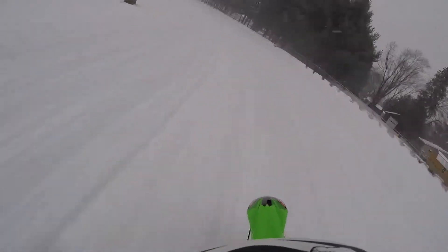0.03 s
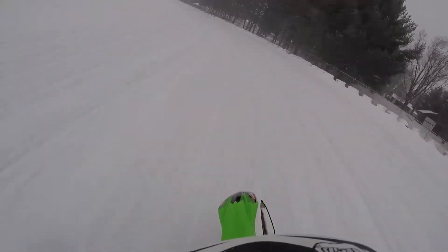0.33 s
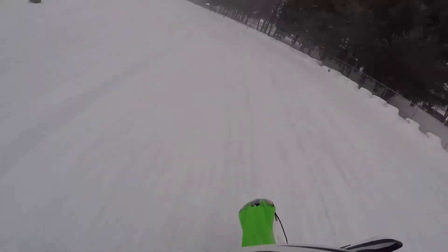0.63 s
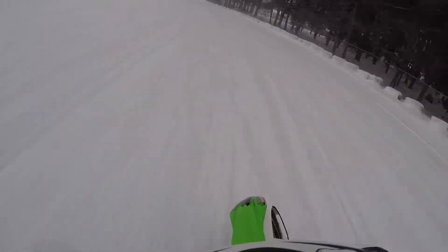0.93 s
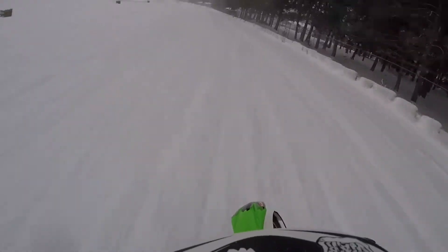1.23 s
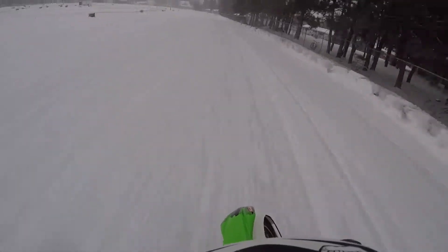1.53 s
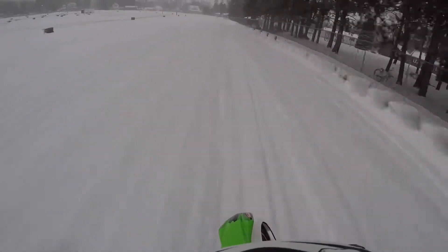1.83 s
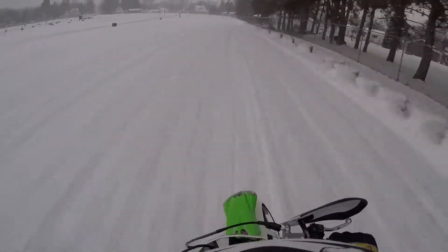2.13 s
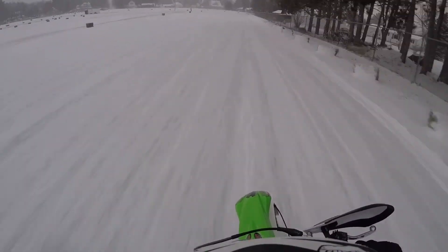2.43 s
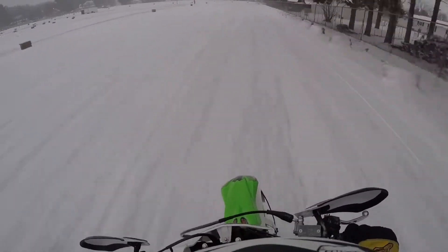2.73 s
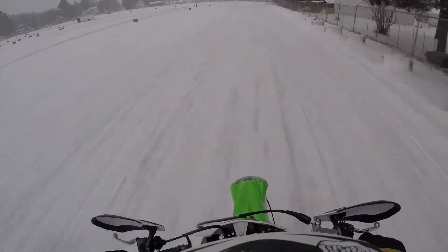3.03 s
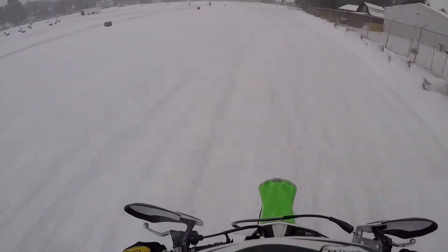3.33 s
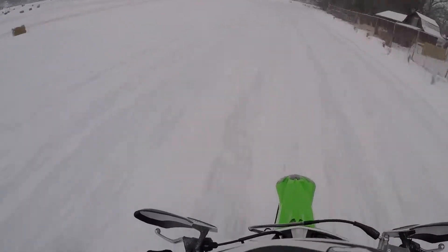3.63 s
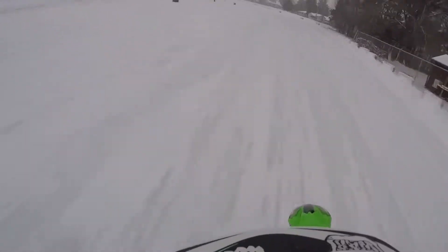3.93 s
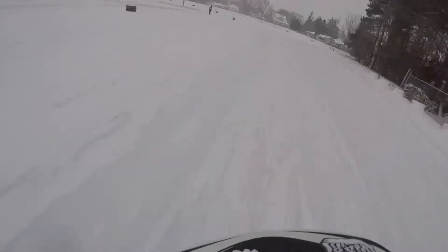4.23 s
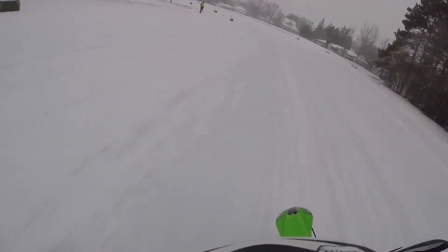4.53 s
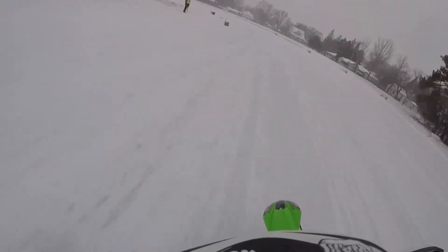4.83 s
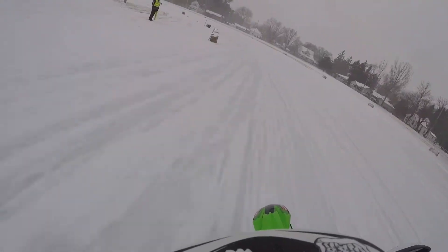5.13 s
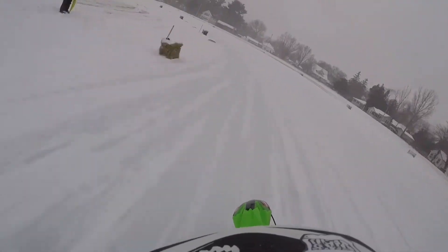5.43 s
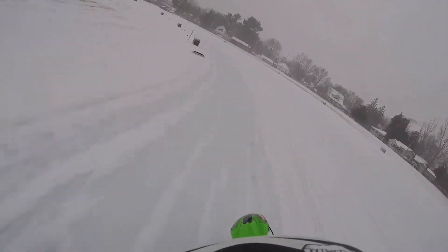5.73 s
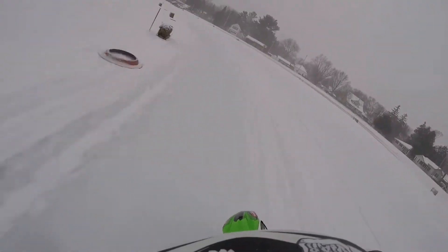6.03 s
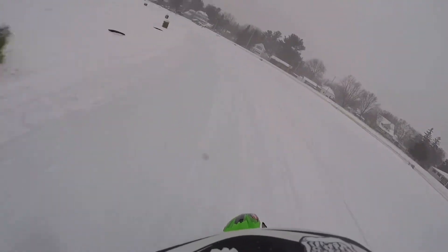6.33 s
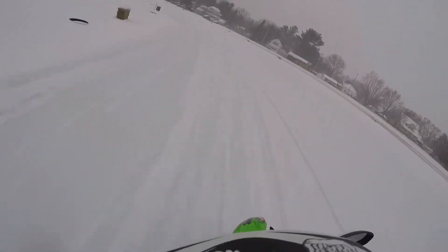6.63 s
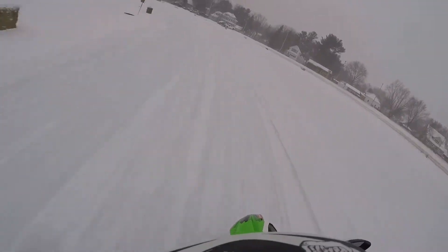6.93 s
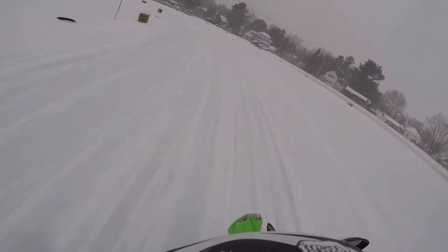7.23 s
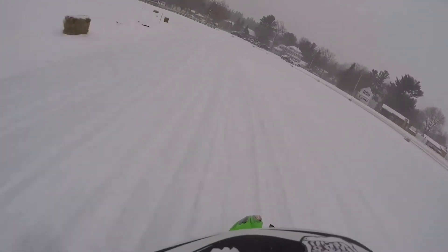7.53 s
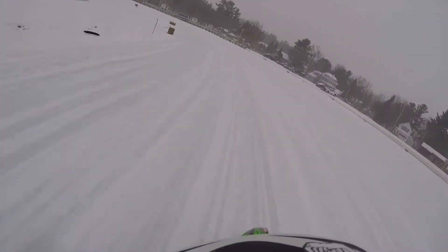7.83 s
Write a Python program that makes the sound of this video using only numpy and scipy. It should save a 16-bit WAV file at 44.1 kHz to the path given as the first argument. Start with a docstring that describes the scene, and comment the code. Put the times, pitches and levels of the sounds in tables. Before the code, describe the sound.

A single-cylinder dirt bike rides over snowy ice, heard close from the rider's helmet. The engine drones loudly from the start, dips briefly around 0.5 seconds, then climbs slowly in pitch with a raspy exhaust. Wind howls around the helmet, strongest from about 2 to 3 seconds, over hissing snow spray. At 4.3 seconds the throttle shuts and the engine falls to a quieter, uneven low throb. Studded tyres roar and scrape more strongly from here, and low gusts thump the microphone near 5 and 6 seconds. From about 6 seconds the engine pulls again at lower revs, starting to open up at the very end, near 8 seconds. The chain rattles, with light clanks scattered from 5 seconds on. Chips of ice tick dryly on the helmet around 0.5, 4, 5.3 and 7.5 seconds.

```python
"""A single-cylinder dirt bike laps a frozen track, heard from the rider's helmet.
Down the straight the open air intake drones and the exhaust rasps with each firing.
At 4.3 s the throttle shuts for the bend and the engine drops to a low throb.
Wind buffets the helmet, studded tyres tear at the ice and spray snow,
the chain rattles, and chips of ice tick on the helmet shell."""
import sys
import numpy as np
from scipy import signal
from scipy.fft import rfft, irfft
from scipy.io import wavfile
from scipy.ndimage import uniform_filter1d, minimum_filter1d

SR = 44100
rng = np.random.default_rng(int(sys.argv[2]) if len(sys.argv) > 2 else 0)


def waveform_to_disk(signal):
    """Save audio, clipped to [-1, 1], as 16-bit WAV at the path in sys.argv[1]."""
    frames = np.transpose(np.atleast_2d(signal))
    scaled = np.clip(frames, -1, 1) * 32767
    samples = np.round(scaled).astype(np.int16)
    wavfile.write(sys.argv[1], SR, samples)


N = 351477
TIME = np.arange(N) / SR
HZ = np.fft.rfftfreq(N, 1 / SR)


def amp(db):
    """Turns decibels into a number to multiply by."""
    return 10 ** (np.asarray(db) / 20)


def evened(x):
    """Scales x to an average size (rms) of 1."""
    return x / np.sqrt(np.mean(x ** 2) + 1e-20)


def curves(rows):
    """Joins the rows of a time table with straight lines, one curve per value column."""
    s, *columns = np.transpose(rows)
    return [np.interp(TIME, s, c) for c in columns]


def level_at(colour, hz):
    """Looks up the dB at hz in a colour: a table of how strong each frequency is."""
    f, db = np.transpose(colour)
    return np.interp(np.log(hz + 1), np.log(f), db)


def coloured(x, colour):
    """Filters x by a colour, fading steeply past its last row; rms 1."""
    rolloff = 1 / (1 + (HZ / colour[-1][0]) ** 8)
    return evened(irfft(rfft(x) * amp(level_at(colour, HZ)) * rolloff, N))


def noise():
    """White noise, a plain hiss."""
    return rng.standard_normal(N)


def wander(rate_hz):
    """A smooth random drift, mostly slower than rate_hz; rms 1."""
    coarse = TIME[::16]
    hz = np.fft.rfftfreq(2 ** 15, coarse[1])
    drift = irfft(rfft(rng.standard_normal(2 ** 15)) / (1 + (hz / rate_hz) ** 4))
    return evened(np.interp(TIME, coarse, drift[:len(coarse)]))


def flutter(centre_hz, width_hz):
    """Uneven swaying near one rate; rms 1."""
    return evened(irfft(rfft(noise()) * np.exp(-.5 * ((HZ - centre_hz) / width_hz) ** 2), N))


def grains(per_s, spread_db):
    """Scattered clicks, most small and a few large; rms 1."""
    size = amp(spread_db * np.minimum(rng.exponential(1, N), 4))
    return evened(size * rng.choice([-1, 1], N) * (rng.random(N) < per_s / SR))


def patches(x, rate_hz, depth_db, count=11):
    """Lets each frequency band of x swell and sink on its own."""
    centres = np.geomspace(300, 9000, count)
    spectrum = rfft(x)
    bands = (irfft(spectrum * np.interp(HZ, centres, row), N) for row in np.eye(count))
    return evened(sum(band * amp(depth_db * wander(rate_hz)) for band in bands))


def add(mix, start_s, sound):
    """Mixes a sound in at start_s."""
    part = mix[round(start_s * SR):][:len(sound)]
    part += sound[:len(part)]


# Wheelspin, a long pull, then braking. Each row: time in seconds, firings per second.
REVS = [(0, 72), (.16, 77.8), (.26, 77.3), (.42, 70.4), (.6, 68.5), (.68, 74), (.82, 76.3), (1.02, 74.8),
        (1.45, 78), (2.06, 80.2), (2.4, 82.2), (2.7, 82), (2.95, 84.2), (3.38, 84.8), (4.3, 87), (4.42, 81),
        (4.7, 66.8), (5.0, 55), (5.5, 52), (6.0, 60.4), (6.25, 56.4), (6.55, 60.3), (7.3, 61.4), (7.78, 60),
        (7.97, 63.5)]
# How open the throttle is. Each row: time in seconds, strength of the intake boom in dB.
THROTTLE = [(0, 0), (.57, -1), (.72, 2.5), (1.6, 1), (2.06, 0.5), (2.4, -3.5), (3.0, -2.5), (3.65, 1.5),
            (4.28, -2.5), (4.32, -6.5), (4.39, -16.5), (4.46, -16), (5.0, -33.5), (7.75, -25.5), (7.97, -5)]
# How hard the engine works. Each row: time in seconds, exhaust level in dB, rasp level in dB.
LOAD = [(0, 2.5, -48), (.25, 0.5, -42), (.6, -3.5, -40), (.8, -1.5, -31), (1.4, 0.5, -29), (2, 0.5, -31.5),
        (2.8, 1, -43), (3.4, -1, -28.5), (4.3, 4.5, -34.5), (4.5, -24, -51), (5.8, -2.5, -47),
        (6.4, -1.5, -33.5), (7.2, 2, -39), (7.97, 1.5, -39)]
# The tone of the exhaust pipe, then of the intake's airbox with the throttle open and nearly shut.
# Each row: frequency in Hz, level in dB of a harmonic that lands there.
EXHAUST = [(60, -25.5), (85, -34), (112, -27), (121, -22), (135, -27), (180, -41.5), (245, -35),
           (360, -33.5), (440, -33), (510, -35), (600, -37.5), (690, -39), (820, -48.5), (1200, -51.5),
           (2000, -57.5)]
AIRBOX_OPEN = [(140, -25.5), (158, -21.5), (170, -17), (205, -30), (220, -20), (231, -15.5), (242, -8.5),
               (260, -7), (300, -8.5), (313, -8), (324, -16.5), (342, -21.5), (385, -28), (430, -35.5)]
AIRBOX_SHUT = [(140, -18), (200, -23), (255, -9), (305, -13), (340, -6), (400, -33)]
# The two notes of the helmet's hollow. Each row: pitch in Hz, width in Hz, share of the lift.
HOLLOW_NOTES = [(169.6, 11, 0.62), (482, 33, 1)]


def engine(shut_db=-3, shut_range_db=3, fifth_boost_db=4):
    """Firings make a stack of harmonics: low ones boom in the airbox, the exhaust adds more and rasps."""
    (firing_hz,), (throttle_db,) = curves(REVS), curves(THROTTLE)
    (exhaust_db, rasp_db), (_, hollow_db) = curves(LOAD), curves(HOWL)
    shut = np.clip((shut_db - throttle_db) / shut_range_db, 0, 1)  # a shut throttle burns unevenly
    firings = np.cumsum(firing_hz * (1 + (0.00506 + 0.01087 * shut) * wander(24.2))) / SR
    strength = amp((-0.1 + 2.4 * shut) * wander(40))
    lift_db = .55 * np.maximum(hollow_db + 35, 0)  # a loud helmet hollow lifts harmonics on its notes
    harmonics = np.zeros(N)
    for k in range(1, 25):
        hz = k * firing_hz
        crank_db = 2.2 * (-1) ** k  # the crank's shaking favours even harmonics
        on_note = sum(share * np.exp(-((hz - note) / width) ** 2) for note, width, share in HOLLOW_NOTES)
        gain = amp(level_at(EXHAUST, hz) + exhaust_db + crank_db + 2.0 * wander(21))
        phase = rng.random()
        if 2 <= k <= 5:
            open_db = level_at(AIRBOX_OPEN, hz) + (fifth_boost_db if k == 5 else 0)
            box_db = open_db + shut * (level_at(AIRBOX_SHUT, hz) - open_db)
            boom = amp(box_db + throttle_db + 0.55 * wander(25))
            gain = np.hypot(gain, boom)
            phase = 0  # one gulp of air starts these harmonics together
        harmonics += gain * amp(lift_db * on_note) * np.cos(2 * np.pi * (k * firings + phase))
    puffs = noise() * np.exp(-(firings % 1) / 0.23)  # one fading puff per firing
    rasp_colour = [(300, -4), (700, -8), (1400, -7.5), (2200, -10.5), (3300, -19.5),
                   (5000, -18), (9000, -41)]
    burble_colour = [(30, -17), (55, -4), (85, 1), (120, -5.5), (180, -18)]
    rasp = amp(rasp_db) * coloured(puffs, rasp_colour)
    burble = shut * amp(exhaust_db - 24.5) * coloured(puffs, burble_colour)
    return strength * (np.sqrt(2) * harmonics + rasp + burble)


# Low wind rumble and thin, high fizz. Each row: time in seconds, level in dB.
BUFFET = [(0, -20), (.55, -26), (.9, -31), (1.7, -35), (2.3, -30), (2.8, -23.5), (3.2, -27), (3.85, -32.5),
          (4.4, -22), (4.9, -21.5), (5.8, -19.5), (6.8, -23.5), (7.4, -18), (7.97, -22)]
FIZZ = [(0, -50), (.27, -53), (.5, -48), (.75, -48), (1.7, -40), (2.0, -40), (2.75, -34), (3.17, -35.5),
        (3.5, -42), (4.35, -38.5), (5.3, -51.5), (7.97, -51)]
# Air round the helmet as the rider sits up. Each row: time in seconds, howl in dB, hollow note in dB.
HOWL = [(0, -32, -28), (.6, -23.5, -32), (.9, -26.5, -46), (1.35, -21.5, -50), (1.801, -17, -19.5),
        (2.4, -17, -23.5), (3.05, -17, -18), (3.3, -25, -33), (3.7, -23, -46), (4.2, -21.5, -46),
        (4.6, -27.5, -45), (7.97, -45, -45)]
# The tone of each wind sound. Each row: frequency in Hz, level in dB.
BUFFET_COLOUR = [(10, -17.5), (25, -6), (45, -3), (70, 0.5), (105, 1.5), (150, -2), (220, -9.5), (350, -14),
                 (600, -34), (1200, -52)]
HOWL_COLOUR = [(40, -37), (90, -6.5), (150, 1.5), (250, 1), (350, -1), (450, -10), (560, -8), (700, -10),
               (900, -15), (1500, -37), (3000, -57)]
HOLLOW_COLOUR = [(250, -33), (380, -15), (440, 4), (485, -1), (530, -11), (620, -19.5), (900, -40)]
FIZZ_COLOUR = [(3000, -23), (5500, 3), (6800, 4), (8000, -4), (9000, -9.5), (10500, -15.5), (12000, -27),
               (14000, -30), (15000, -40)]


def wind():
    """Swirling air buffets the microphone, howls round the helmet, sounds its hollow and fizzes past."""
    (buffet_db,), (howl_db, hollow_db), (fizz_db,) = map(curves, (BUFFET, HOWL, FIZZ))
    buffet = amp(buffet_db + 2.0 + 0.51 * wander(7.2)) * coloured(noise(), BUFFET_COLOUR)
    howl = amp(howl_db + wander(25)) * coloured(noise(), HOWL_COLOUR)
    hollow = amp(hollow_db) * coloured(noise(), HOLLOW_COLOUR)
    fizz = amp(fizz_db + 6.5 + 1.1 * wander(40)) * coloured(noise(), FIZZ_COLOUR)
    return buffet + howl + hollow + fizz


# The tyres on the ice. Each row: time in seconds, roar in dB, hiss of snow spray in dB.
TYRE_LEVELS = [(0.0, -24.5, -32), (0.24, -25.5, -33), (0.44, -25.5, -28), (0.86, -30, -37),
               (2.73, -26.5, -27.5), (3.6, -31, -29.5), (3.73, -25.5, -27), (4.37, -23.5, -27),
               (4.71, -20, -26), (6.55, -18.5, -29), (6.64, -17, -23), (6.86, -18.5, -31),
               (6.92, -18.5, -27.5), (7.84, -19.5, -30.5), (7.88, -17.5, -27), (7.97, -21, -29)]
# Ruts press the tyres or let them go light. Each row: middle in seconds, length in seconds, change in dB.
RUTS = [(0.505, 0.035, 1.5), (0.613, 0.054, 1.5), (3.705, 0.027, 1.5), (4.94, 0.019, 3), (5.282, .025, 1),
        (6.679, 0.027, 1), (6.955, .08, 0.5), (7.376, 0.016, 1.5), (7.513, 0.027, -8), (7.624, .05, 2.5)]


def tyre_levels(roar_trim_db=-0.69, hiss_trim_db=0.87):
    """How loud the roar and the spray are: each rut adds one smooth swell or dip to both."""
    roar_db, hiss_db = curves(TYRE_LEVELS)
    rut_db = sum(db * np.exp(-(2 * (TIME - s) / length) ** 4) for s, length, db in RUTS)
    return roar_db + rut_db + roar_trim_db, hiss_db + rut_db + hiss_trim_db


# The tone of the tyre roar and of the snow spray. Each row: frequency in Hz, level in dB.
ROAR_COLOUR = [(80, -25), (250, -2), (500, -4.5), (800, -1.5), (1250, 1), (1700, -2.5), (2200, -7),
               (2800, -12), (3500, -20), (5000, -19), (8000, -56)]
SPRAY_COLOUR = [(1500, -23), (2800, -10.5), (3600, -8), (4300, 0), (5000, 0), (6000, -1.5), (7000, -18),
                (8500, -18.5), (11000, -42)]


def tyre_rush():
    """Torn air, crackling ice and snow spray; the louder the roar, the more ragged it is."""
    roar_db, hiss_db = tyre_levels()
    ragged = np.clip((roar_db + 35.5) / 16, .15, 1)
    gust_db = ragged * (0.8 * flutter(14.5, 6.1) + 0.68 * wander(60) + 1.9 * wander(350))
    crackle = ragged * grains(per_s=1200, spread_db=4.5)
    air = patches((noise() + 0.72 * crackle) * amp(gust_db), rate_hz=50, depth_db=1.5)
    spray = patches((noise() + 0.28 * crackle) * amp(1.03 * gust_db), rate_hz=29, depth_db=1.35)
    weight = np.clip((roar_db + 29) / 8, 0, 1)  # a strong roar gains body
    body_colour = [(100, -18), (300, 0.5), (600, -2.5), (900, -1), (1300, -9), (2200, -38)]
    body = amp(roar_db - 5.5) * weight * coloured(noise(), body_colour)
    roar = amp(roar_db - .5) * coloured(air, ROAR_COLOUR)
    hiss = amp(hiss_db - .5) * coloured(spray, SPRAY_COLOUR)
    return body + roar + hiss


# Studs scrape as the bike leans into a bend. Each row: time in seconds, level in dB.
SCRAPE = [(0, -33), (.3, -38), (.45, -28), (.62, -34), (.69, -54), (3.6, -38), (3.72, -27), (4.4, -29),
          (5.4, -24), (6.0, -37), (6.7, -27), (7.0, -35.5), (7.97, -49)]
# The tone of the scrape. Each row: frequency in Hz, level in dB.
SCRAPE_COLOUR = [(900, -24.5), (1400, 1.5), (1800, 0), (2400, -1), (3200, -15.5), (4500, -24), (8000, -47)]


def stud_scrape():
    """Hundreds of studs a second scratch through the ice."""
    level_db, = curves(SCRAPE)
    return amp(level_db) * coloured(0.36 * noise() + grains(per_s=800, spread_db=4.5), SCRAPE_COLOUR)


def ring(pitch_hz, decay_s):
    """One note of struck metal that starts softly and dies away."""
    t = np.arange(4096) / SR
    return t / decay_s * np.exp(1 - t / decay_s) * np.sin(2 * np.pi * (pitch_hz * t + rng.random()))


# Clanks of the chain and other moving parts. Each row: start in seconds, pitch in Hz, level in dB.
CLANKS = [(4.84, 1760, -11.5), (5.316, 1660, -14.5), (6.622, 5130, -18), (6.841, 1362, -10.5),
          (6.945, 5100, -18), (6.96, 4520, -18), (7.425, 1710, -12.5), (7.475, 1350, -11),
          (7.497, 1190, -9), (7.618, 1769, -13.5)]


def chain_clatter(count=16, rattle_db=-10):
    """The chain's rattle rises and falls with the tyre roar, with a few louder clanks."""
    roar_db, _ = tyre_levels()
    pitches = np.geomspace(950, 2200, count) * rng.uniform(0.93, 1.03, count)
    rattle = sum(signal.oaconvolve(grains(per_s=17, spread_db=2.5), ring(hz, 0.0019))[:N]
                 for hz in pitches)
    out = amp(roar_db + rattle_db) * evened(rattle)
    for s, hz, db in CLANKS:
        add(out, s, amp(db) * ring(hz, decay_s=0.0026))
    return out


# Flying chips of ice. Each row: start in seconds, level in dB.
CHIPS = [(0.3246, -12), (0.4314, -15), (0.5103, -7), (3.8504, -11), (4.0435, -16), (4.0835, -6.5),
         (5.287, -7), (5.378, -6.5), (7.3836, -12), (7.734, -11.5), (7.879, -6.5)]
# The tone of a chip's tick. Each row: frequency in Hz, level in dB.
CHIP_COLOUR = [(300, -26), (1200, -25), (2000, 10), (3400, 1.5), (5000, 5), (6500, -3), (9000, -20),
               (14000, -49)]


def ice_chips(decay_s=0.0018, trim_db=-3):
    """Each chip gives one dry tick on the helmet shell."""
    out = np.zeros(N)
    t = np.arange(1024) / SR
    colour = amp(level_at(CHIP_COLOUR, np.fft.rfftfreq(len(t), 1 / SR)))
    for s, db in CHIPS:
        burst = rng.standard_normal(len(t)) * t * np.exp(-t / decay_s)
        tick = irfft(rfft(burst) * colour)
        add(out, s, amp(db + trim_db) * tick / abs(tick).max())
    return out


# Single gusts of wind. Each row: start in seconds, level in dB.
THUMPS = [(4.891, -10), (5.235, -9.5), (5.96, -8.5)]


def gust_thumps(rise_s=0.022):
    """A gust hits the microphone as a low thump that swells and quickly dies."""
    out = np.zeros(N)
    t = np.arange(8192) / SR
    colour = [(30, -18), (70, -4), (95, 0), (130, -2), (220, -37)]
    for s, db in THUMPS:
        gust = coloured(noise(), colour)[:len(t)] * t * np.exp(-t / rise_s)
        add(out, s, amp(db) * gust / abs(gust).max())
    return out


def scene():
    """Everything meets at the helmet, in one channel."""
    return (engine() + wind() + gust_thumps() + tyre_rush() + stud_scrape()
            + chain_clatter() + ice_chips())[None]


def record(dry, ceiling=0.89, top_hz=15000):
    """Turns loud peaks down, fades the very end and cuts the highest treble."""
    needed_gain = np.minimum(1, ceiling / (abs(dry) + 1e-9))
    gain = uniform_filter1d(minimum_filter1d(needed_gain, size=180), size=180)
    gain *= np.minimum((TIME[-1] - TIME) / .004, 1)
    lowpass = signal.firwin(511, top_hz, window=("kaiser", 9), fs=SR)
    return signal.oaconvolve(dry * gain, lowpass[None], "same")


dry = scene()
out = record(dry)
waveform_to_disk(out)
```